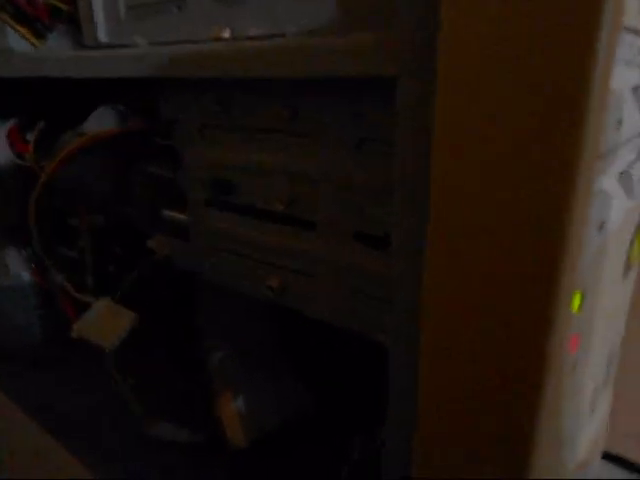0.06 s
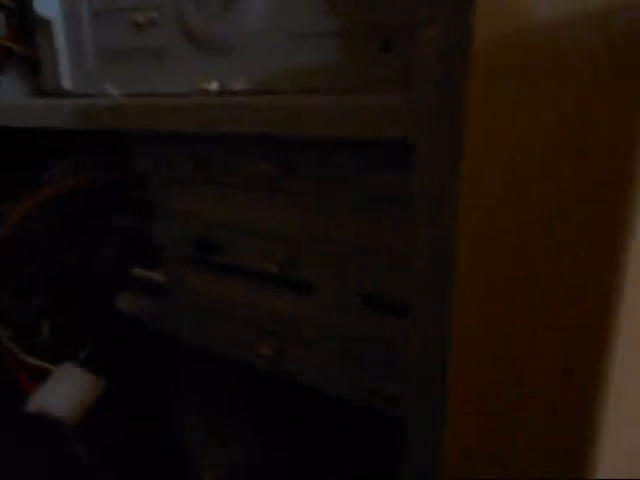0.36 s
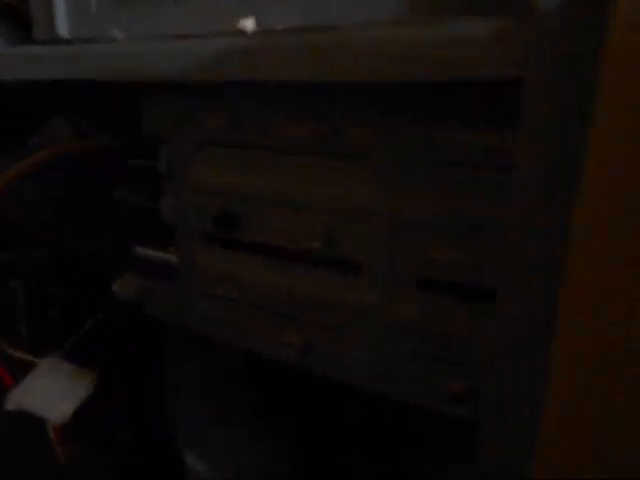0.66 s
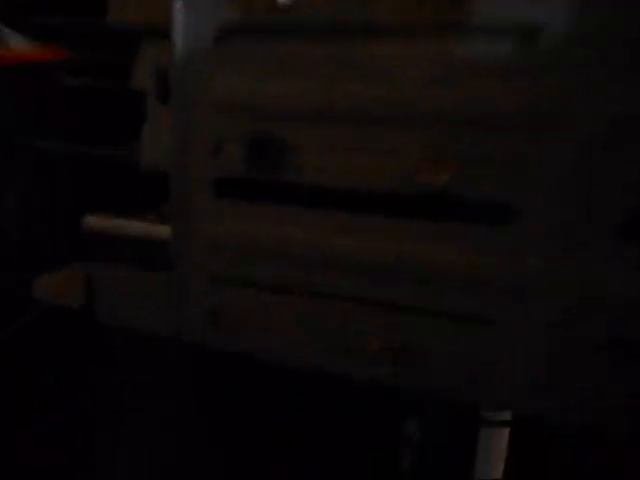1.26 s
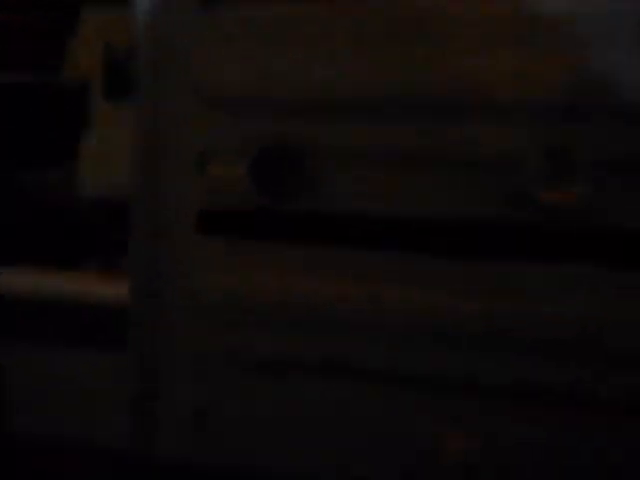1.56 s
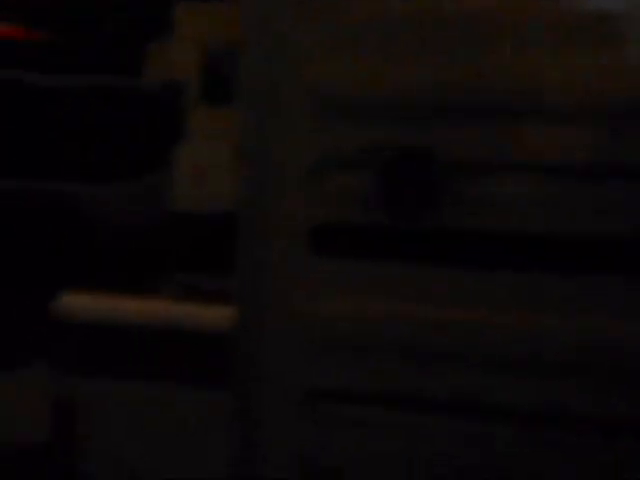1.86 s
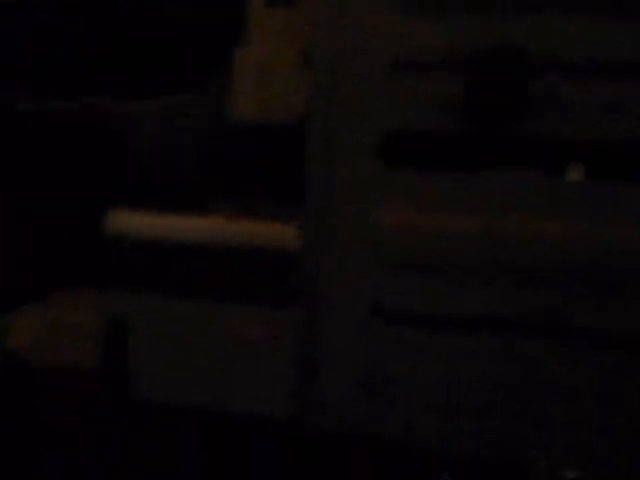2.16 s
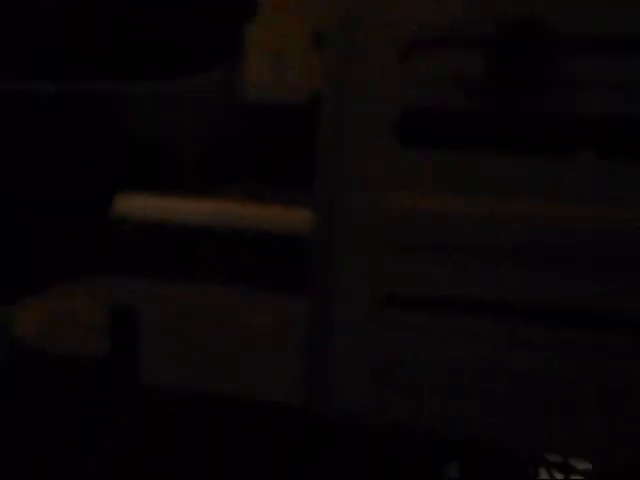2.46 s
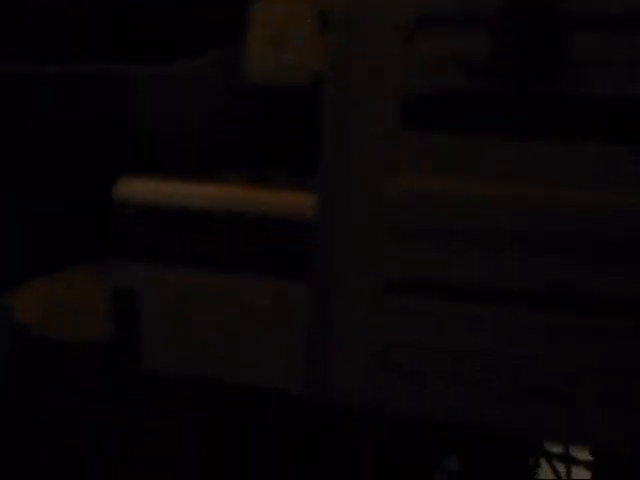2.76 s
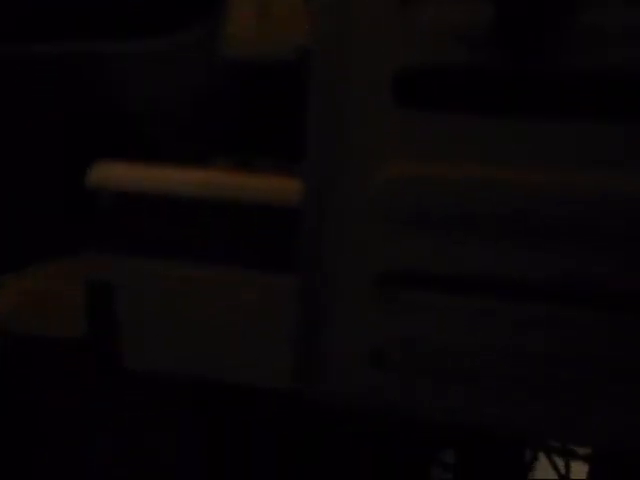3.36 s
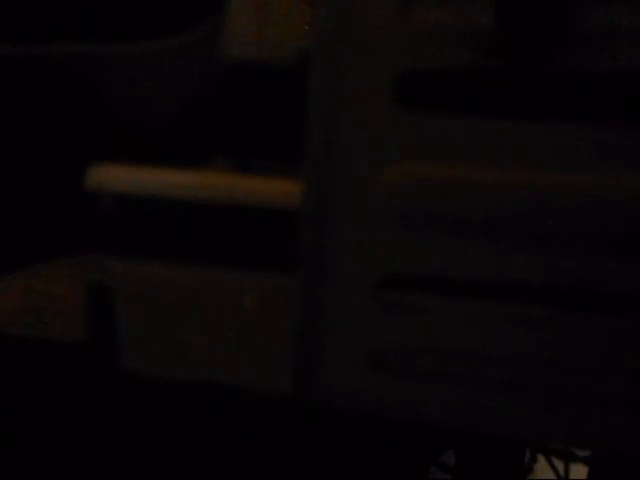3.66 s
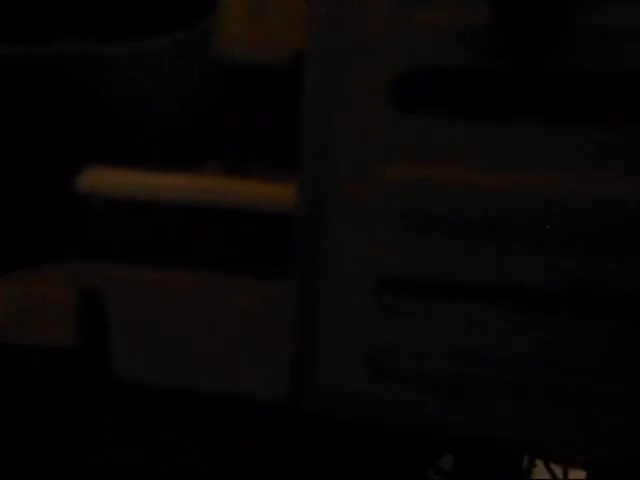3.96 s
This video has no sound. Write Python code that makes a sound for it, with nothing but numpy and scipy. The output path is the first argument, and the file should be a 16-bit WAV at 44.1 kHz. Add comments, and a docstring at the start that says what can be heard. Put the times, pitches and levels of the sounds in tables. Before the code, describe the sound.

A computer fan and drive spin up with a rising hum and whine. The metal case knocks and ticks in handling, then gives one loud clack. The whir grows and steadies as a hand-held microphone moves closer in a small room.

```python
"""An open computer in a small room, just switched on, heard from a hand-held microphone. The drive
spindle starts to whine and the fan to rush and hum, while the metal case is knocked and scraped in
handling and small parts tick. About a second in, a hard clack makes the recorder's gain control duck
the whir for a moment. The microphone moves in close to the drive bay, a few more ticks and a light
knock follow, and fan and spindle level off at full speed."""
import sys
import numpy as np
from scipy import signal
from scipy.fft import rfft, irfft
from scipy.io import wavfile
from scipy.ndimage import uniform_filter1d, minimum_filter1d

SR = 44100
rng = np.random.default_rng(int(sys.argv[2]) if len(sys.argv) > 2 else 0)


def master(y):
    """Save y as 16-bit WAV."""
    cut = np.clip(np.atleast_2d(y).T, -1, 1)
    pcm = np.round(cut * 32767)  # scale
    wavfile.write(sys.argv[1], SR, pcm.astype(np.int16))


N = 176400
T = np.arange(N) / SR

# Strength of the air flow as the fan runs up. Each row: time in seconds, gain in dB.
FLOW_GAIN = [(0, -12), (.25, -7), (.4, -7), (.55, -5), (.8, -1), (1.5, -2.5), (2.5, -1), (4, -0.5)]


def spindle(near):
    """Motor whine: multiples of the turn rate, each singing out as it crosses a housing resonance."""
    # The run-up. Each row: time in seconds, turns per second.
    speed = [(0, 73), (.35, 82.9), (.6, 87.6), (.8, 90.35), (1.02, 92.4), (1.3, 94.1), (1.6, 95.2),
             (2, 95.72), (2.5, 95.98), (4, 95.98)]
    # The whine. Each row: multiple of the turn rate (rounded in use), relative dB far off and close up.
    partials = [(1, -57, -47), (14, -52, -40.5), (21, -57, -53.5), (24, -47, -45), (28, -54.5, -34.5),
                (32, -71, -33), (35, -57, -44.5), (36, -58, -56), (40, -65, -42), (44, -66, -54),
                (49, -68, -49), (52, -68, -47), (56, -71, -50.5), (58, -69, -53), (91, -63, -66),
                (94.7, -62, -51.5), (99, -68, -66)]
    # Resonances of the drive housing. Each row: centre in Hz, width in Hz, lift in dB.
    housing = [(2035, 45, 9), (2195, 100, 9), (2440, 40, 10)]
    # Swell of the whine as the motor gathers speed. Each row: time in seconds, gain in dB.
    swell = [(0, -22), (.27, -14), (.4, 0), (.6, -3), (.85, 1), (1.4, 0), (4, 0)]
    whine = 0
    for multiple, far_db, close_db in partials:
        hz = round(multiple) * curve(speed)
        lift_db = sum(db / (1 + (2 * (hz - centre) / width) ** 2) for centre, width, db in housing)
        whine += tone(hz, waver_db=0.9) * mic_gain(far_db, close_db, near) * amp(lift_db)
    return whine * amp(curve(swell))


def fan_blades(near):
    """The fan's hum at the rate its blades pass, with weak overtones that grow with the air flow."""
    # The run-up. Each row: time in seconds, blade passes per second.
    blade_rate = [(0, 250), (.4, 279), (.7, 297), (1, 312.5), (1.4, 324.3), (1.8, 331.5), (2.3, 336.5),
                  (2.8, 338.6), (3.4, 339.6), (4, 339.6)]
    # The blade tone at the microphone. Each row: time in seconds, level in dB.
    hum_level = [(0, -45), (.35, -45), (.6, -38), (1, -39), (1.25, -30.5), (1.45, -27), (1.75, -27),
                 (2.3, -25.5), (3.1, -25), (4, -25.5)]
    # Its overtones. Each row: multiple of the blade rate, relative dB far off and close up.
    partials = [(2, -38.5, -39), (3, -56, -47), (4, -49, -41.5)]
    jitter, waver_db = 0.0014, 0.2
    hz = curve(blade_rate) * (1 + jitter * wander(15.8))
    overtones = sum(tone(multiple * hz, waver_db) * mic_gain(far_db, close_db, near)
                    for multiple, far_db, close_db in partials)
    hum = tone(hz, waver_db) * amp(curve(hum_level))
    return hum + overtones * amp(curve(FLOW_GAIN))


def air_rush(near):
    """Turbulence from the fan: a broad rush and the hollow resonances of the case."""
    # The rush. Each row: frequency in Hz, relative density in dB far off and close up.
    spectrum = [(20, -51.5, -54), (42, -55.5, -58.5), (68.4, -65.5, -68.5), (113, -71.5, -58),
                (169, -66.5, -63.5), (260, -60.5, -54), (408, -58, -52.5), (498, -64, -54.5),
                (527, -55.5, -50.5), (777, -58.5, -60.5), (940, -61.5, -58), (1050, -64.5, -66),
                (1204, -64, -56.5), (1545, -67.5, -63), (1720, -71.5, -58.5), (2040, -63, -67),
                (2500, -70.5, -62.5), (3380, -72, -64.5), (4400, -73, -68.5), (5620, -78, -70.5),
                (6170, -78.5, -75), (8260, -85.5, -79.5), (9080, -76.5, -77.5), (10510, -90, -87)]
    # Air resonances of the case. Each row: centre in Hz, width in Hz, relative dB far off and close up.
    cavities = [(140, 76, -49.5, -41), (231, 39, -44, -45.5), (632.4, 40, -30.5, -32.5),
                (814.4, 46, -41, -29.5), (976, 44, -45, -49.5)]
    log_hz = np.log([row[0] for row in spectrum])
    white = rng.standard_normal(N) * np.sqrt(SR / 2)  # unit power per Hz
    rush = 0
    for (_, far_db, close_db), weights in zip(spectrum, np.eye(len(spectrum))):
        one_band = filtered(white, lambda f: np.interp(np.log(f), log_hz, weights))
        rush += one_band * mic_gain(far_db, close_db, near)
    for centre, width, far_db, close_db in cavities:
        rush += noise(band(centre, width)) * mic_gain(far_db, close_db, near)
    waver_db = 1.44 * wander(3)
    return rush * amp(curve(FLOW_GAIN) + waver_db)


def clacks():
    """Three hard contacts on metal within ten milliseconds, heard as one loud clack."""
    # The contacts. Each row: start in seconds, relative level in dB, treble lift in dB per octave.
    contacts = [(1.0912, 0.5, 0), (1.097, 6, 5), (1.101, 1, -2)]
    # Their crack. Each row: frequency in Hz, relative density in dB.
    crack = [(100, -16), (500, -5.5), (1500, -2), (2600, 0.5), (3400, 0), (4000, -5), (5800, -13),
             (7700, -2), (8700, -12), (10200, -12)]
    # Their ring. Each row: frequency in Hz, relative level in dB, seconds to fall 60 dB.
    modes = [(553, -18, .07), (1048, -18, .06), (1811, -14, .05), (1988, -5, .055), (2287, -7, .05),
             (2496, -6, .05), (2805, -9, .045), (3338, -6, .045), (5525, -14, .025), (6476, -8, .025),
             (9710, -14, .02)]
    out = np.zeros(N)
    for start, db, lift_db in contacts:
        strike = metal_strike(crack, modes, lift_db, t60=0.04, ring_db=-3.5, attack_s=0.0003)
        add(out, start, amp(db) * strike)
    return out


def knocks():
    """The case rattles in the hand: softer blows that set its panels ringing."""
    # Each row: start in seconds, relative level in dB, treble lift in dB per octave,
    # seconds for the crack to fall 60 dB.
    blows = [(0, -29.5, 3, 0.3), (0.022, -22, 1, 0.11), (.046, -21, 0.5, 0.19), (0.088, -17, 2.5, 0.14),
             (0.11, -16, -1, 0.18), (0.119, -4.5, 1.5, 0.063), (2.603, -22.5, 5, 0.1)]
    # Body of the case. Each row: frequency in Hz, relative density in dB.
    body = [(80, -20), (250, -18), (400, -0.5), (600, -22), (1000, 1.5), (1700, 0.5), (2600, -4),
            (3600, -10), (5000, -15.5), (6500, -24), (7800, -22), (10400, -32.5)]
    # Panel modes. Each row: frequency in Hz, relative level in dB, seconds to fall 60 dB.
    modes = [(392, -5, 0.081), (895, -14, 0.12), (1117, -13.5, 0.25), (1300, -17.5, 0.24),
             (1426, -6, 0.076), (1733, -8.5, 0.089), (2240, -3.5, 0.055), (2975, -4, .06),
             (3660, -7, 0.048)]
    out = np.zeros(N)
    for start, db, lift_db, t60 in blows:
        add(out, start, amp(db) * metal_strike(body, modes, lift_db, t60, ring_db=-1.5, attack_s=0.0012))
    return out


def metal_strike(spectrum, modes, lift_db, t60, ring_db, attack_s):
    """A blow on metal: a dense crack and a few ringing modes, brighter when the contact is harder."""
    t = T[:SR // 2]
    tilt = lambda f: amp(lift_db * np.log2(np.clip(f, 500, 10000) / 2000))
    crack = noise(lambda f: colour(spectrum)(f) * tilt(f), len(t)) * decay(t, t60)
    ring = sum(amp(db) * tilt(hz) * np.sin(2 * np.pi * (hz * t + rng.random())) * decay(t, ring_s)
               for hz, db, ring_s in modes)
    return (crack + amp(ring_db) * ring) * (1 - np.exp(-t / attack_s))


def ticks_and_bumps():
    """Small parts tick and the hand bumps dully: each a burst of noise dying away in one band."""
    # Each row of both: start in seconds, relative level in dB, centre in Hz, width in Hz,
    # seconds to fall 60 dB.
    ticks = [(.286, -18.5, 3800, 2500, 0.014), (0.2912, -20, 5000, 2500, 0.01),
             (.3565, -12.5, 4400, 694, 0.0055), (0.356, -15, 6500, 700, 0.0078),
             (0.3815, -15.5, 2320, 1300, 0.037), (.889, -27.5, 4500, 4000, .03),
             (.929, -16, 3730, 3780, 0.055), (0.965, -27, 5500, 4900, .05), (2.327, -20, 8740, 900, 0.064),
             (2.4405, -17, 4840, 1100, 0.077), (2.443, -16.5, 9100, 3500, 0.067)]
    bumps = [(0.058, -30, 40, 50, 0.34), (.232, -25, 45, 60, 0.11), (.288, -22, 110, 119, .08),
             (.303, -18, 880, 400, 0.03)]
    out, t = np.zeros(N), T[:SR // 2]
    for start, db, hz, width, t60 in ticks + bumps:
        attack_s = 0.033 * t60
        envelope = (1 - np.exp(-t / attack_s)) * decay(t, t60)
        add(out, start, amp(db - 0.5) * noise(band(hz, width), len(t)) * envelope)
    return out


def scrapes():
    """Short rubs on the case: a high hiss that swells and falls, rough with friction."""
    # Each row: start in seconds, length in seconds, relative level in dB, centre in Hz, width in Hz.
    strokes = [(0.103, 0.014, -32, 8650, 2500), (0.187, 0.099, -32, 4300, 3000),
               (0.301, 0.14, -36.5, 4700, 2400)]
    out, t = np.zeros(N), T[:SR // 2]
    for start, length, db, hz, width in strokes:
        swell = np.sin(np.pi * np.minimum(t / length, 1))
        roughness = amp(2.1 * wander(180)[:len(t)])
        add(out, start, amp(db) * noise(band(hz, width), len(t)) * swell * roughness)
    return out


def room(direct):
    """The direct sound with the short, dull echo of a small room 22 dB under it."""
    t = T[:SR // 2]
    build_up = np.minimum(t / 0.023, 1)
    tail = noise(lambda f: 1 / np.hypot(1, f / 2200), len(t)) * decay(t, t60=0.19) * build_up
    return direct + amp(-22) * signal.fftconvolve(direct, tail / np.linalg.norm(tail))[:N]


def mic_gain(far_db, close_db, near):
    """Gain of a layer as the microphone moves from far off (near = 0) to close up (near = 1)."""
    return amp(far_db + (close_db - far_db) * near)


def tone(hz, waver_db):
    """A tone locked to a turning part, wavering in level."""
    cycles = np.cumsum(hz) / SR + rng.random()
    return np.sqrt(2) * np.sin(2 * np.pi * cycles) * amp(waver_db * wander(10))


def amp(db):
    """Decibels to gain."""
    return 10 ** (np.asarray(db) / 20)


def curve(rows):
    """Straight lines through (seconds, value) points."""
    return np.interp(T, *np.array(rows, float).T)


def decay(t, t60):
    """Exponential decay, 60 dB down after t60 seconds."""
    return np.exp(-np.log(1000) * t / t60)


def filtered(x, gain_at):
    """Filter by a gain given as a function of frequency."""
    hz = np.maximum(np.arange(len(x) // 2 + 1) * SR / len(x), 1)
    return irfft(rfft(x) * gain_at(hz), len(x))


def colour(points):
    """Gain through (Hz, dB) points on a log-frequency axis."""
    hz, db = np.array(points, float).T
    return lambda f: amp(np.interp(np.log(f), np.log(hz), db))


def band(hz, width):
    """Gain of a steep resonance."""
    return lambda f: 1 / (1 + ((f * f - hz * hz) / (f * width)) ** 2 / 2)


def noise(gain_at, size=N):
    """Coloured noise of rms 1."""
    x = filtered(rng.standard_normal(size), gain_at)
    return x / np.sqrt(np.mean(x ** 2))


def wander(rate_hz):
    """Random drift of rms 1, mostly slower than rate_hz."""
    return noise(lambda f: 1 / (1 + (f / rate_hz) ** 2) ** 2)


def add(out, start, x):
    """Mix a sound in at a start time in seconds."""
    i = int(start * SR)
    out[i:i + len(x)] += x[:N - i]


def scene():
    """At one moving microphone: fan and spindle run on under the handling, which echoes in the room."""
    # The microphone's path to the drive bay. Each row: time in seconds, nearness from 0 far to 1 close.
    mic_path = [(0, 0.53), (.4, 0.31), (.7, 0.12), (1.05, 0.64), (1.5, 0.58), (1.85, 0.86), (2.3, 0.95),
                (3, 0.98), (4, 0.99)]
    near = curve(mic_path)
    whir = air_rush(near) + fan_blades(near) + spindle(near)
    handling = clacks() + knocks() + ticks_and_bumps() + scrapes()
    return (whir + room(handling))[None]


def record(dry):
    """The recorder's gain ducks at once on a loud sound, holds and recovers; peaks clip, the top is cut."""
    limit_db, top_hz = -12, 10450
    sense_s, lookahead_s, hold_s, release_s = 0.0055, 0.003, 0.15, 0.16
    mic = dry[0]
    power = np.interp(T + lookahead_s, T, uniform_filter1d(mic ** 2, int(sense_s * SR)))
    over_db = np.maximum(10 * np.log10(np.maximum(power, 1e-12)) - limit_db, 0)
    half_hold = int(hold_s * SR / 2)
    # the largest overshoot of the last hold_s seconds
    held_db = -minimum_filter1d(-over_db, 2 * half_hold + 1, origin=half_hold, mode="constant")
    recovery = np.exp(T / release_s)
    duck_db = np.maximum.accumulate(held_db * recovery) / recovery
    clipped = np.clip(mic * amp(-duck_db), -1, 1)
    top_cut = signal.ellip(9, 0.2, 80, top_hz, fs=SR, output="sos")
    return signal.sosfilt(top_cut, clipped)[None]


dry = scene()
out = record(dry)
master(out)
```